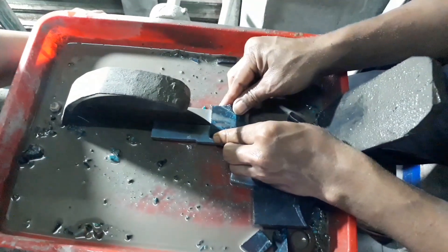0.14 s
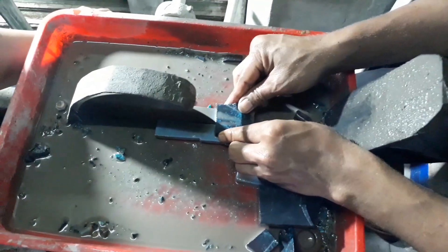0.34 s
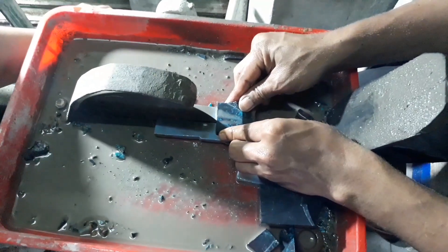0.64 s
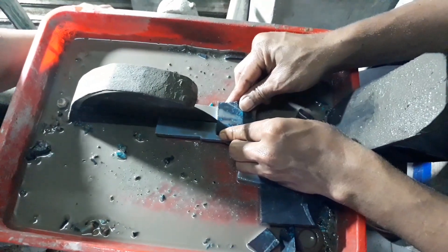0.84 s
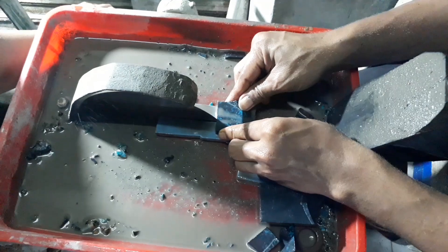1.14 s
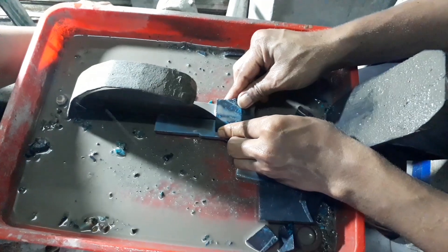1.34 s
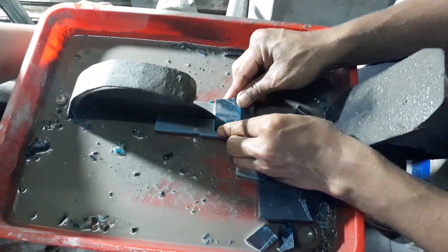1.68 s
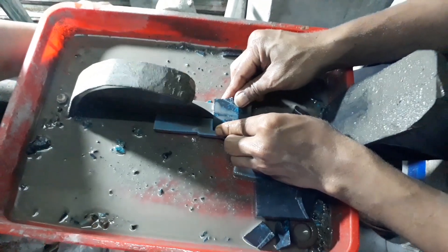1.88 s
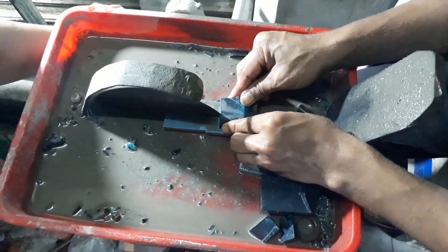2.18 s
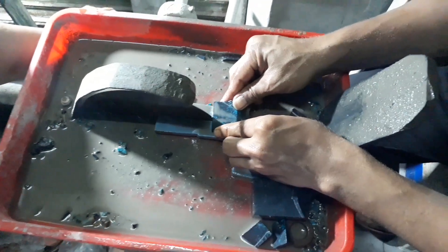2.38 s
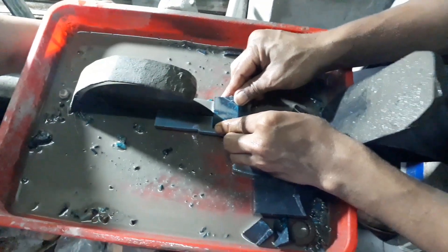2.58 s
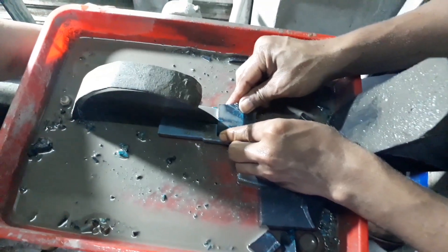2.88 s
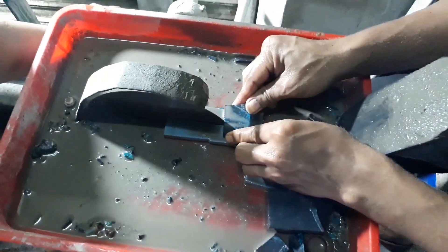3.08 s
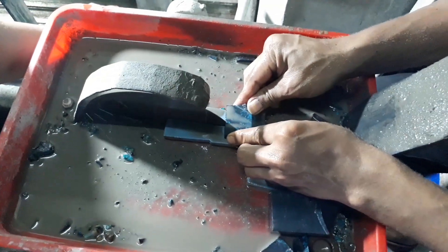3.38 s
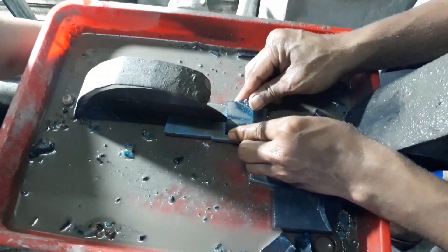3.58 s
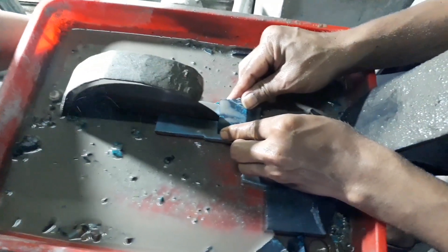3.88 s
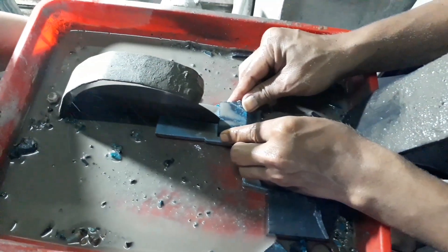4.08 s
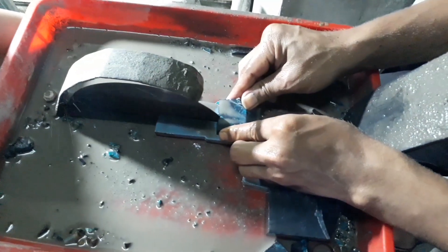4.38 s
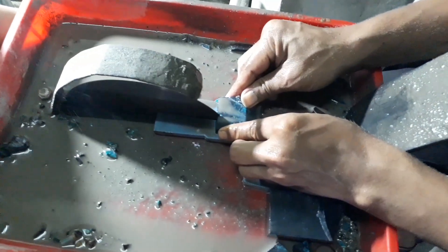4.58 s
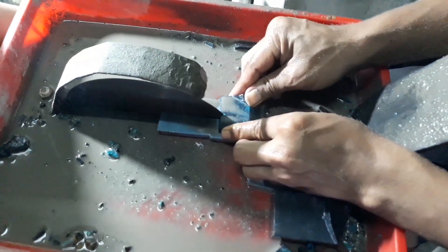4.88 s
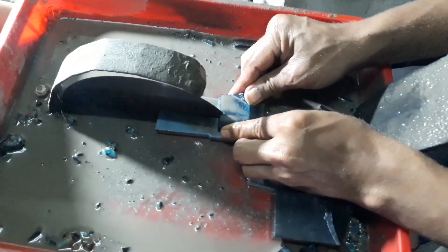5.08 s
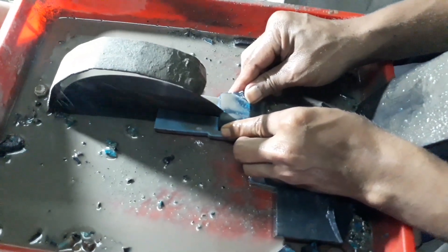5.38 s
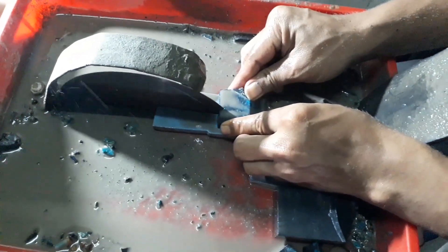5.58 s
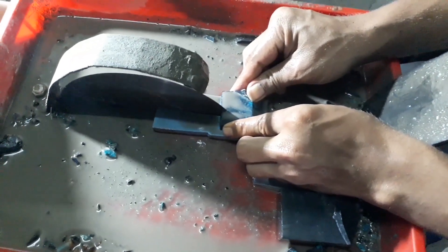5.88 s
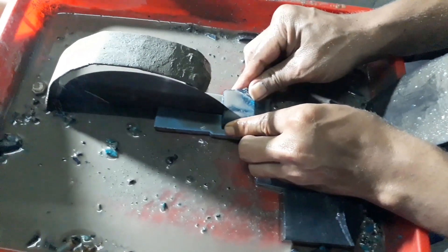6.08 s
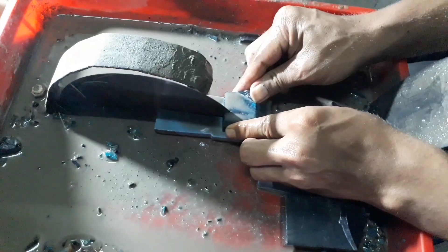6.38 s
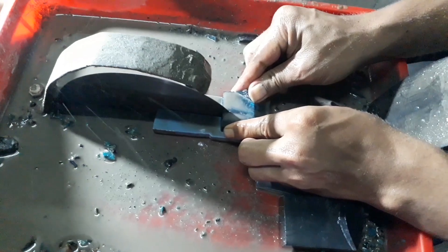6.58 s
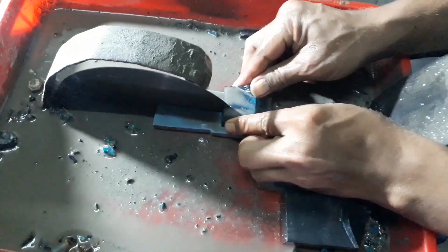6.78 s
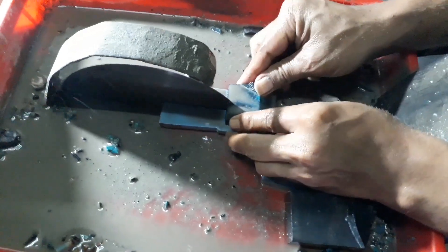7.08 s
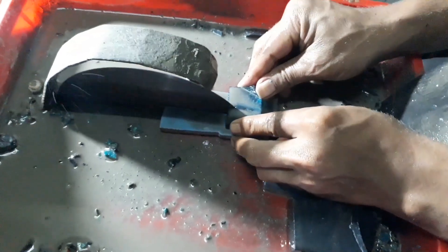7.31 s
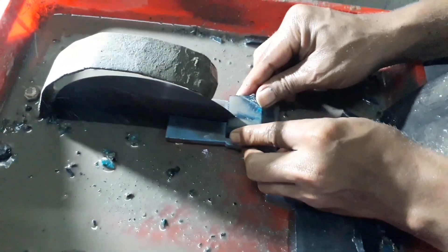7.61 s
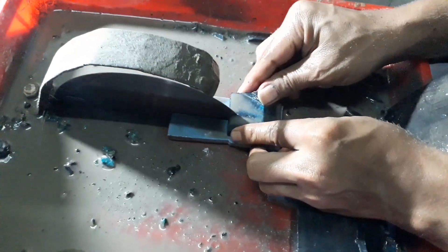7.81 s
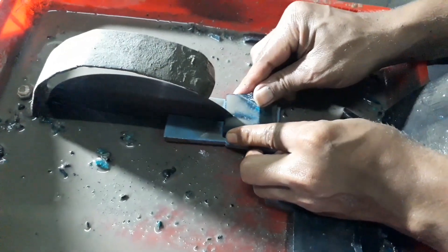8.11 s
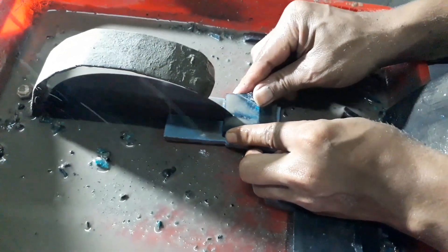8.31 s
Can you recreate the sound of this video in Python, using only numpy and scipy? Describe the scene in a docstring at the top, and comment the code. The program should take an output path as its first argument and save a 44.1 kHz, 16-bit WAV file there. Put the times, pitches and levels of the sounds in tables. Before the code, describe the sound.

Continuous abrasive grinding of stone on a small wet saw, very near the microphone, with no room echo. The level stays almost steady while the ringing colour shifts slowly as the cut deepens. Rapid low knocks purr under the hiss and a cluster of wavering tones sings through it. Towards the end the tones and knocks weaken and wind buffets arrive in sharp, crackly thumps.

```python
"""A wet diamond blade grinds through a slab of stone, heard dry and close in mono.
The rim scrapes out a partly repeating pattern and fresh grit hisses, both filtered by the blade's ringing modes.
Tones locked to the spin sing out and fade as breakthrough nears; high spots on the rim knock the saw table.
Puffs of air off the blade jolt the microphone, more and more towards the end."""
import sys
import numpy as np
from scipy import signal
from scipy.io import wavfile
from scipy.ndimage import uniform_filter1d

SR = 44100
rng = np.random.default_rng(int(sys.argv[2]) if len(sys.argv) > 2 else 0)


def generate_wav(signal):
    """Clip the signal to [-1, 1] and save it as 16-bit WAV at the path in sys.argv[1]."""
    frames = np.transpose(np.atleast_2d(signal))
    scaled = np.clip(frames, -1, 1) * 32767
    pcm = np.round(scaled).astype(np.int16)
    wavfile.write(sys.argv[1], SR, pcm)


N = 372644  # samples
STFT = dict(fs=SR, nperseg=2048, noverlap=1536)
RIM_PLACES = 1536  # pattern cells in one turn of the rim


def gain_of(db):
    """Decibels to an amplitude factor."""
    return 10 ** (np.asarray(db) / 20)


def evened(x):
    """Scales to rms 1."""
    return x / np.sqrt(np.mean(x ** 2) + 1e-20)


def follow(rows, t):
    """Reads every column of a breakpoint curve at the times t."""
    s, *columns = np.transpose(rows)
    return np.array([np.interp(t, s, column) for column in columns])


def wander(shape, sizes):
    """Smooth random drift of rms 1: noise averaged twice over sizes[k] cells along axis k."""
    x = rng.standard_normal(shape)
    for axis, size in enumerate(sizes):
        cells = max(round(size), 1)
        for _ in range(2):
            x = uniform_filter1d(x, cells, axis, mode="wrap")
    return evened(x)


# Spin of the blade: time_s, speed_turns_per_s
BLADE_SPEED = [(0, 29.1), (.7, 29.08), (1.1, 28.97), (1.9, 28.92), (3.1, 28.82), (3.5, 28.66), (4.3, 28.6),
               (5.3, 28.66), (6.5, 28.57), (6.9, 28.8), (7.3, 29.1), (8.45, 28.8)]


def blade_turns(t):
    """Adds up the blade speed into turns made so far; everything tied to the spin reads this."""
    return np.cumsum(follow(BLADE_SPEED, t)[0]) / SR


# Feed pressure, heard as the grind's level: time_s, level_db, repeating_share_0_to_1 (power, in the lows)
FEED_PRESSURE = [(0.0, -14, 0.36), (1.06, -13.5, 0.3), (1.15, -15.5, 0.3), (2.38, -13, 0.46),
                 (4.66, -14.5, 0.45), (4.85, -13, 0.57), (6.31, -14.5, 0.32), (6.75, -15, 0.5),
                 (6.82, -12, 0), (6.9, -15.5, 0.33), (8.28, -15, 0.35), (8.45, -19, 0.5)]


def grind(turns, t):
    """Stone scraped by a worn rim pattern that comes round each turn, plus fresh grit, coloured by the blade."""
    turn_count = int(turns[-1]) + 2
    worn_pattern = wander((turn_count, RIM_PLACES), (5, 1))  # changes over some turns
    worn = evened(off_the_rim(worn_pattern, turns))

    # high spots bite harder once a turn
    high_spots_db = off_the_rim(wander((turn_count, RIM_PLACES), (8, 50)), turns)
    judder_db = 0.4 * wander(N, (600,))
    grit = evened(rng.standard_normal(N) * gain_of(high_spots_db + judder_db))

    hz, frames, worn_z = signal.stft(worn, **STFT)
    grit_z = signal.stft(grit, **STFT)[2]
    share = np.clip(follow(FEED_PRESSURE, frames)[1], 0, 1)
    repeat = share / (1 + (hz[:, None] / 3200) ** 4)  # the fine treble grit hardly repeats
    z = np.sqrt(repeat) * worn_z + np.sqrt(1 - repeat) * grit_z

    # many weak modes come and go slowly above 2.5 kHz, over broader, quicker patches
    small_modes_db = 2.1 * wander(z.shape, (2, 90)) * (hz[:, None] > 2500)
    patches_db = 0.7 * wander(z.shape, (25, 4))
    z *= np.sqrt(blade_colour(hz, frames))
    z *= gain_of(family_gain_db(hz, frames) + small_modes_db + patches_db)
    coloured = evened(signal.istft(z, **STFT)[1][:N])
    return gain_of(follow(FEED_PRESSURE, t)[0]) * coloured


def off_the_rim(pattern, turns):
    """Reads a (turn, place on the rim) pattern as the blade spins past the stone."""
    return np.interp(turns * RIM_PLACES, np.arange(pattern.size), pattern.ravel())


# Stages of the cut: shallow_until_s, deep_from_s, deep_until_s, near_breakthrough_from_s
CUT_STAGES_S = (1.5, 2.7, 5.2, 6.4)
# Bare scrape spectrum before the modes, relative per Hz: pitch_hz, level_db
SCRAPE_SPECTRUM = [(30, -65), (60, -38), (90, -11.5), (130, -10.5), (240, 5), (330, -7.5), (650, -3.5),
                   (900, -4.5), (2000, 1), (2600, -3), (4200, -3), (7900, -2.5), (9400, -3.5), (13800, -5),
                   (15700, -6.5)]
# Ringing blade modes, levels over the scrape: pitch_hz, width_hz, shallow_db, deep_db, near_breakthrough_db
BLADE_MODES = [(1040, 70, 3, 4, 2), (1250, 150, 0, 3, -2), (1620, 80, 5, 4, -2), (2880, 310, 4, 4, 3),
               (3210, 180, 1, 4, 4), (3400, 100, 3, 2, 4), (3850, 350, -1, 3, 3), (4385, 40, 7, 6, 6),
               (4530, 310, -3, 4, 3), (4750, 60, 5, -2, 0), (4900, 130, 9, 9, 4), (4970, 45, 14, 8, 5),
               (5400, 40, 4, 6, 4), (5490, 120, 9, 8, 8), (5590, 110, 6, 9, 11), (5990, 390, 1, 5, 1),
               (6260, 230, 6, 3, -2), (6740, 220, 5, 7, 4), (6840, 60, 8, 2, 2), (6940, 70, 4, 6, 5),
               (7520, 500, 0, 2, 1), (8360, 230, 8, 6, 4), (8780, 340, 8, 3, 4), (9170, 90, 6, -4, 0),
               (9670, 290, 4, 1, -2), (9990, 120, 8, -6, -2), (10520, 190, 3, 4, 6), (10860, 170, 8, 2, 1),
               (11700, 470, 6, 0, 3), (12560, 310, 6, 4, 5)]


def blade_colour(hz, frames):
    """Power gain of scrape and modes; the stone damps other modes as the cut deepens."""
    power = np.ones((len(hz), len(frames)))
    for mode_hz, width_hz, shallow_db, deep_db, through_db in BLADE_MODES:
        peak = 1 / (1 + (2 * (hz - mode_hz) / width_hz) ** 2) ** 2
        level_db = np.interp(frames, CUT_STAGES_S, (shallow_db, deep_db, deep_db, through_db))
        power += np.outer(peak, gain_of(2 * level_db))  # doubled dB turn amplitude into power
    scrape_hz, scrape_db = np.transpose(SCRAPE_SPECTRUM)
    scrape_level_db = np.interp(np.log(hz + 1), np.log(scrape_hz), scrape_db)
    return power * gain_of(2 * scrape_level_db)[:, None]


# Balance of the mode families as the kerf grips the blade elsewhere:
# pitch_hz, shallow_db, deep_db, near_breakthrough_db
MODE_FAMILIES = [(550, 1.8, 0.24, 0.99), (1510, 0, -0.86, -0.43), (3300, 0.3, -0.2, -0.71),
                 (5500, .5, 0.55, -0.16), (6740, 0, -0.1, 1.1), (8500, -0.4, -0.67, 0.98),
                 (11000, -1.5, 0, 0.78), (14300, 1, 0, 1.2)]
# Slow swells and dips of part of the grind: centre_s, duration_s, centre_hz, width_octaves, change_db
GRIND_SWELLS = [(2.4, 2, 5100, 0.33, 3), (6.15, 0.99, 12000, 0.73, 1.5), (6.9, 1.3, 1200, 4.5, -2),
                (5.9, 1.2, 10700, 0.17, 2.5), (4.24, 0.98, 2600, 0.71, 1.5), (6.813, 0.11, 1500, 2.9, -4.5),
                (7.9, 0.63, 920, 1.8, 4)]


def family_gain_db(hz, frames):
    """The deepening kerf shifts weight between mode families; a few bands also swell and dip."""
    family_hz, shallow_db, deep_db, through_db = np.transpose(MODE_FAMILIES)
    stage_curves = (shallow_db, deep_db, deep_db, through_db)
    stages_db = np.array([np.interp(hz, family_hz, db) for db in stage_curves])
    weights = np.array([np.interp(frames, CUT_STAGES_S, row) for row in np.eye(len(CUT_STAGES_S))])
    balance_db = stages_db.T @ weights
    for centre_s, duration_s, centre_hz, octaves, change_db in GRIND_SWELLS:
        band = np.exp(-(2 * np.log2((hz + 1) / centre_hz) / octaves) ** 2)
        moment = np.exp(-(2 * (frames - centre_s) / duration_s) ** 2)
        balance_db += change_db * np.outer(band, moment)
    return balance_db


# Time over which the tones go from shallow to deep levels: start_s, end_s
TONE_DEEPENING_S = (2.3, 3.3)
TONE_FADE_S, TONE_END_DB = (5.95, 7.2), -53  # start and end of the fade; rms level it reaches
# Tones singing out of the grind, rms before their waver: multiple_of_blade_speed, shallow_db, deep_db
SPIN_TONES = [(10, -41, -42), (24, -39, -52), (27, -44, -46), (29, -44, -46), (33, -55, -39),
              (34, -55, -44), (36, -39, -37), (37, -43, -44), (40, -50, -34), (42, -52, -37),
              (44, -44, -40), (46, -41, -54), (55, -39, -39), (56, -38, -35), (57, -38, -54),
              (58, -48, -42), (66, -46, -36), (67, -56, -43), (71, -56, -43), (75, -56, -42),
              (80, -48, -44), (86, -54, -41), (97, -44, -52), (99, -56, -43), (100, -46, -41)]


def order_tones(turns, t):
    """Sines locked to multiples of the spin; each wavers, follows the depth of the cut and fades."""
    out = np.zeros(N)
    coarse = np.arange(0, N + 400, 400) / SR
    for multiple, shallow_db, deep_db in SPIN_TONES:
        level_db = np.interp(coarse, tuple(TONE_DEEPENING_S) + TONE_FADE_S,
                             (shallow_db, deep_db, deep_db, TONE_END_DB))
        swell = gain_of(level_db + 1.4 * wander(len(coarse), (30,)))
        slip = np.interp(t, coarse, 0.5 * wander(len(coarse), (20,)))  # phase drift, radians
        phase = 2 * np.pi * multiple * turns + slip + 2 * np.pi * rng.random()
        out += np.sqrt(2) * np.interp(t, coarse, swell) * np.cos(phase)
    return out


# Blows of two high spots on the rim, before their scatter: time_s, first_spot_db, second_spot_db
RIM_KNOCKS = [(0, -22, -25), (1, -24.5, -24), (2, -20.5, -22), (2.9, -16, -18), (3.5, -25, -23.5),
              (5, -21, -25), (5.6, -23, -43), (6.6, -23, -40), (6.8, -29, -40), (8.45, -45, -40)]
# Saw table modes: pitch_hz, width_hz, level_db
TABLE_MODES = [(205, 60, -2), (235, 90, 0), (290, 50, -3)]


def knocks(turns, t):
    """Two blows a turn, each of its own strength, ring the damped modes of the saw table."""
    blows = np.zeros(N)
    for place, level_db in zip((0.58, 0.24), follow(RIM_KNOCKS, t)):  # place on the rim in turns
        at = np.flatnonzero(np.diff(np.floor(turns - place)))
        alternate_db = 2.5 * (-1.0) ** np.arange(len(at))  # every second turn strikes harder
        scatter_db = 2 * rng.standard_normal(len(at))
        blows[at] += gain_of(level_db[at] + alternate_db + scatter_db)

    ring_t = np.arange(2000) / SR
    ring = np.zeros(len(ring_t))
    for hz, width_hz, level_db in TABLE_MODES:
        decay = np.exp(-np.pi * width_hz * ring_t)
        ring += gain_of(level_db) * decay * np.sin(2 * np.pi * hz * ring_t)
    ring *= 1 - np.exp(-ring_t / 0.002)  # soft onset
    rung = signal.oaconvolve(blows, ring)[:N]
    dull_body = signal.butter(2, (190, 310), "band", fs=SR, output="sos")
    return signal.sosfilt(dull_body, rung)


JOLT_PEAK_S = 0.00025  # from the start of a puff to the peak of its jolt
# Strongest puffs: jolt_peak_s, jolt_db, push_or_pull_sign, rebound_scale_db
STRONG_PUFFS = [(4.5944, -8, 1, -17), (5.8368, -11, -1, -26), (5.9742, -8, -1, -20), (6.001, -3, 1, -23),
                (6.1522, -8, 1, -28), (6.1872, -9, -1, -21), (6.3371, -11, -1, -16), (6.3587, -5, 1, -12),
                (6.4, -11, 1, -20), (6.5512, -10, -1, -21), (6.6071, -5, 1, -29), (6.6769, -11, -1, -34),
                (6.7116, -11, 1, -34), (6.8526, -11, -1, -21), (7.129, -13, -1, -24), (7.3798, -7, -1, -13),
                (7.4252, -10, 1, -27), (7.4666, -8, -1, -14), (7.4923, -5, 1, -12), (7.5012, -6, 1, -16),
                (7.5331, -9, 1, -20), (7.5609, -10, 1, -21), (7.7099, -10, -1, -34), (7.7177, -7, 1, -25),
                (7.7332, -3, 1, -14), (7.7505, -8, -1, -19), (7.7791, -5, 1, -16), (7.8061, -9, -1, -18),
                (7.8263, -4, 1, -13), (7.85, -6, 1, -16), (7.8782, -9, 1, -30), (7.9397, -9, 1, -16),
                (7.9689, -8, -1, -31), (8.0183, -9, 1, -30), (8.0376, -8, 1, -24), (8.1177, -4, -1, -13),
                (8.1415, -9, -1, -30), (8.1525, -8, -1, -34), (8.1804, -7, 1, -14), (8.2207, -6, -1, -12),
                (8.2574, -7, -1, -34), (8.2641, -4, 1, -12), (8.2903, -3, -1, -11), (8.3111, -8, 1, -30),
                (8.3229, -9, 1, -15), (8.3436, -6, -1, -34), (8.3849, -6, 1, -17), (8.4111, -10, -1, -29)]


def wind(t):
    """Air off the blade: the strong puffs, and a patter of small ones of either sign with a low thud."""
    strong = np.zeros(N + 900)
    for peak_s, jolt_db, sign, rebound_db in STRONG_PUFFS:
        at = round((peak_s - JOLT_PEAK_S) * SR)
        strong[at:at + 900] += sign * puff(jolt_db, rebound_db)

    small = rng.laplace(size=N) * (rng.random(N) < 260 / SR)  # about 260 a second
    patter = evened(signal.oaconvolve(small, puff(0, -7.5))[:N])
    low_pass = signal.butter(2, 180, fs=SR, output="sos")
    thud = evened(signal.sosfilt(low_pass, patter))
    gusts = gain_of(gustiness_db(t))
    return strong[:N] + gusts * (gain_of(2.5) * patter + gain_of(-0.5) * thud)


def puff(jolt_db, rebound_db):
    """Air pressure jolts the microphone membrane, which then rebounds slowly once."""
    t = np.arange(900) / SR
    jolt = t / JOLT_PEAK_S * np.exp(1 - t / JOLT_PEAK_S)
    rebound = np.sin(2 * np.pi * 110 * t) * np.exp(-500 * t)
    rebound *= 1 - np.exp(-(t / 0.0006) ** 2)  # soft onset
    return gain_of(jolt_db) * jolt - gain_of(rebound_db) * rebound


# Gusts that carry the patter, levels before the patter and thud gains: start_s, hold_s, level_db
PATTER_GUSTS = [(4.19, 0.022, -43), (4.58, .03, -38), (4.89, .02, -45), (5.264, .07, -38),
                (5.98, 0.044, -34), (6.14, .05, -36), (6.335, .06, -31.5), (6.55, 0.21, -38),
                (6.85, .03, -39), (7.118, 0.027, -42), (7.46, 0.054, -30), (7.704, 0.15, -31),
                (7.95, .12, -31), (8.104, 0.089, -26), (8.242, 0.17, -29)]
CALM_DB, GUST_RISE_DB_PER_S, GUST_FALL_DB_PER_S = -56, 300, 250


def gustiness_db(t):
    """Each gust rises out of the calm, holds, and falls back; the strongest one at any time wins."""
    out = np.full(N, float(CALM_DB))
    for start_s, hold_s, level_db in PATTER_GUSTS:
        before_db = GUST_RISE_DB_PER_S * (start_s - t)
        after_db = GUST_FALL_DB_PER_S * (t - start_s - hold_s)
        below_db = np.maximum(np.maximum(before_db, after_db), 0)
        out = np.maximum(out, level_db - below_db)
    return out


def scene():
    """All sources add up at one microphone, sent alike to both channels."""
    t = np.arange(N) / SR
    turns = blade_turns(t)
    mix = grind(turns, t) + order_tones(turns, t) + knocks(turns, t) + wind(t)
    return np.tile(mix, (2, 1))


def record(dry):
    """Soft overload on the peaks, microphone bass cut, then a steep treble limit."""
    soft = 1.4 * np.tanh(dry / 1.4)
    bass_cut = signal.butter(3, 60, "high", fs=SR, output="sos")
    cut = signal.sosfilt(bass_cut, soft)
    treble_limit = signal.firwin(2047, 15760, window=("kaiser", 12), fs=SR)  # edge in Hz
    return signal.oaconvolve(cut, treble_limit[None], "same")


dry = scene()
out = record(dry)
generate_wav(out)
```